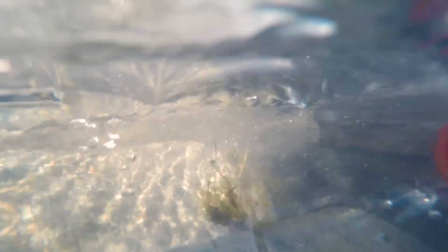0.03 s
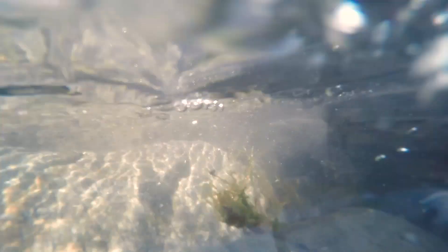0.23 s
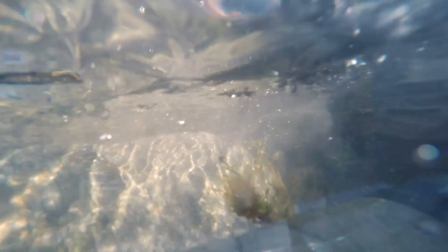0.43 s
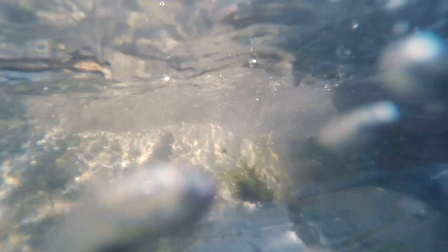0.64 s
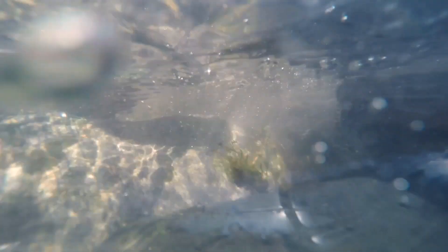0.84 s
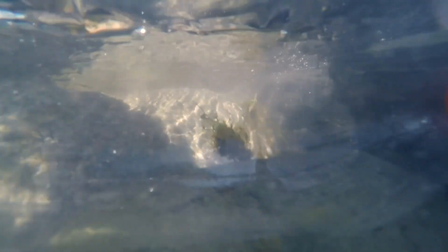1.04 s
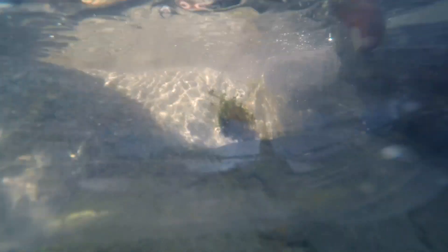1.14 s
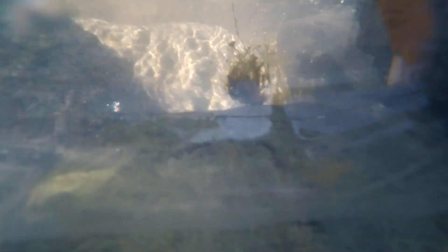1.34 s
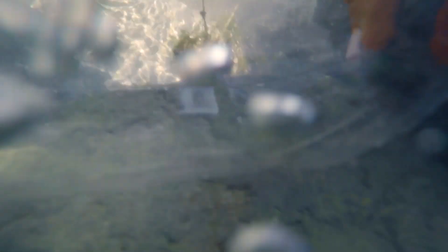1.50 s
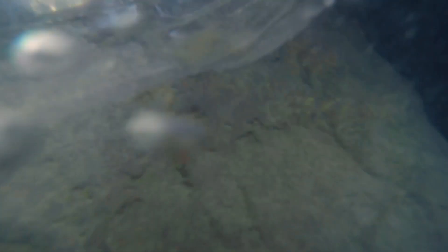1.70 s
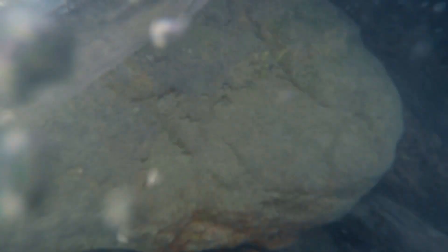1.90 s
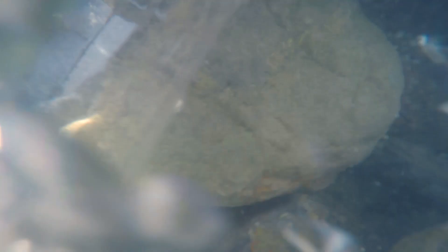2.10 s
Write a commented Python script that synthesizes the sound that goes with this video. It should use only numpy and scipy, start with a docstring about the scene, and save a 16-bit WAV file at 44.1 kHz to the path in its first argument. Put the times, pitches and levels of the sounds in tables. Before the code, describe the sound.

Muffled rush of a shallow rocky stream heard by a microphone inside a submerged housing; low rumble swells, close bubbles pop and crackle thickest midway, a sharp knock follows, then the rumble eases and the rush opens.

```python
"""A camera is held just under the surface of a fast, stony stream.
From the start, shaped noise gives the deep buffeting of its housing and the muffled rush of the rapids.
Air bubbles snap and ring close by as dying tones, thickest at about one second, in crackling torn water.
A sharp knock and two faint gliding whistles of narrow-band noise follow.
At the end the rumble eases and the rush opens up."""
import sys
import numpy as np
from scipy import signal
from scipy.fft import rfft, irfft
from scipy.io import wavfile
from scipy.ndimage import uniform_filter1d

SR = 44100
rng = np.random.default_rng(int(sys.argv[2]) if len(sys.argv) > 2 else 0)


def output_pcm(signal):
    """Save a mono or channel-first signal as 16-bit PCM at the path in sys.argv[1].

    Samples are clipped to [-1, 1] before scaling.
    """
    pcm = np.clip(np.atleast_2d(signal).T, -1, 1) * 32767
    wavfile.write(sys.argv[1], SR, np.round(pcm).astype(np.int16))


N = 94815
T = np.arange(N) / SR
RING_T = np.arange(2600) / SR  # time axis of one short sound [s]

# rush of the rapids: (time [s], middle level [dB], upper-middle level [dB], fizz level [dB])
RUSH_LEVELS = [(0, -50, -59, -75), (.22, -47.5, -58, -71), (.45, -43, -56, -69), (.75, -42, -53, -68),
               (1.0, -41, -53, -67), (1.33, -39, -52, -67), (1.5, -44.5, -53, -68), (1.7, -48.5, -59, -72),
               (1.82, -53, -64, -77), (1.98, -49, -59, -76), (2.07, -45, -54, -68), (2.15, -42, -48, -62)]


def amp(db):
    """Decibels to gain."""
    return 10 ** (np.asarray(db) / 20)


def unit(x):
    """Scales to an rms of one."""
    return x / np.sqrt(np.mean(x ** 2) + 1e-20)


def level(table, column=1):
    """Gain over time from one dB column of a table."""
    table = np.array(table)
    return amp(np.interp(T, table[:, 0], table[:, column]))


def add(mix, start_s, sound):
    """Mixes a sound in at a time, cut at the end of the mix."""
    part = mix[max(round(start_s * SR), 0):][:len(sound)]
    part += sound[:len(part)]


def noise(colour):
    """Gaussian noise of unit rms with a spectrum given as (frequency [Hz], level [dB])."""
    hz, db = np.transpose(colour)
    bin_hz = np.fft.rfftfreq(N, 1 / SR)
    gain = amp(np.interp(np.log(bin_hz + 1), np.log(hz), db))
    return unit(irfft(rfft(rng.standard_normal(N)) * gain, N))


def patchy(x, patchy_db, flicker_db):
    """Lets small patches of the spectrum, and the whole of it, rise and fall at random (rms dB)."""
    z = signal.stft(x, nperseg=512, noverlap=384)[2]
    patches = uniform_filter1d(rng.standard_normal(z.shape), size=5, axis=0)  # across frequency
    patches = unit(uniform_filter1d(patches, size=14, axis=1))  # across time
    flicker = unit(uniform_filter1d(rng.standard_normal(z.shape[1]), size=5))
    z = z * amp(patchy_db * patches + flicker_db * flicker)
    return unit(signal.istft(z, nperseg=512, noverlap=384)[1][:N])


def steady(x, size):
    """Evens out the slow swells of a noise by dividing by its smoothed power's root."""
    power = uniform_filter1d(uniform_filter1d(x ** 2, size), size)
    return x / np.sqrt(power + 1e-9)


def decay(t, t60_s):
    """Exponential decay that falls 60 dB in t60_s."""
    return np.exp(-np.log(1000) * t / t60_s)


def ring(hz, t60_s):
    """One ringing resonance: swells over about its first cycle, then dies as its pitch climbs slightly."""
    swell_cycles, pitch_rise = 1.1, .03
    glide = 1 + pitch_rise * np.minimum(RING_T / t60_s, 1)
    swell = 1 - np.exp(-(RING_T * hz / swell_cycles) ** 2)
    shape = swell * decay(RING_T, t60_s)
    return shape / shape.max() * np.sin(2 * np.pi * np.cumsum(hz * glide) / SR)


def snap():
    """The brief crack of a water film breaking: a dying noise burst, band-passed."""
    decay_s, low_hz, high_hz = .0005, 1100, 5000
    burst = rng.standard_normal(len(RING_T)) * np.exp(-RING_T / decay_s)
    band = signal.butter(1, [low_hz, high_hz], "bandpass", fs=SR, output="sos")
    burst = uniform_filter1d(signal.sosfilt(band, burst), size=2)
    return 2 * burst / np.linalg.norm(burst)


def current():
    """Eddies press on the housing: a deep sway, a rumble and a churn above them."""
    # push of the current: (time [s], sway level [dB], rumble level [dB])
    push_levels = [(0, -31, -32), (.17, -32, -29), (.25, -23, -24), (.33, -27, -25), (.55, -23, -22),
                   (.75, -18, -20), (.95, -15, -16), (1.1, -22, -17), (1.18, -21, -20), (1.25, -15, -9.5),
                   (1.33, -11, -15), (1.42, -15, -9.5), (1.5, -23, -22), (1.59, -12, -22), (1.66, -16, -21),
                   (1.75, -13, -21), (1.81, -24, -28), (1.97, -28, -28), (2.07, -38, -34), (2.15, -37, -35)]
    # low churning of the eddies: (time [s], level [dB])
    churn_levels = [(0, -41), (.2, -38), (.5, -34.5), (.8, -29.5), (1.05, -28), (1.15, -28), (1.25, -25),
                    (1.34, -35), (1.42, -30), (1.5, -37), (1.59, -45), (1.65, -30), (1.75, -44),
                    (1.85, -40), (1.97, -32), (2.06, -37), (2.15, -35)]
    # spectra of the three: (frequency [Hz], level [dB])
    sway_colour = [(6, -25), (14, -10), (24, -1), (42, 0), (52, -5), (70, -20), (150, -55), (600, -110)]
    rumble_colour = [(20, -22), (42, -6), (60, 0), (68, 0), (85, -5), (115, -7), (160, -22), (260, -44),
                     (600, -85), (2000, -130)]
    churn_colour = [(50, -25), (100, -4), (135, 0), (190, -2), (230, -11), (275, -11), (340, -19),
                    (500, -30), (1000, -55), (4000, -100)]
    sway = level(push_levels, column=1) * steady(noise(sway_colour), size=2600)
    rumble = level(push_levels, column=2) * steady(noise(rumble_colour), size=2000)
    churn = level(churn_levels) * steady(noise(churn_colour), size=1400)
    return sway + rumble + churn


def rush():
    """The rapids heard through water: gurgle, muffled roar and a trace of fizz, all patchy noise."""
    # hollow gurgle below the roar: (time [s], level [dB])
    gurgle_levels = [(0, -56), (.22, -50), (.45, -46), (.75, -41), (.96, -35), (1.1, -39), (1.3, -35),
                     (1.5, -42), (1.65, -51), (1.8, -53), (1.92, -49), (2.07, -44), (2.15, -44)]
    # spectra of the four bands: (frequency [Hz], level [dB])
    gurgle_colour = [(150, -15), (300, -4), (400, 1), (560, -4), (720, -10), (900, -13), (1150, -19),
                     (2000, -42), (6000, -80)]
    middle_colour = [(400, -25), (800, -15), (1050, -7), (1350, 0), (1550, -1), (1780, -1), (2100, -8),
                     (2500, -13), (3300, -32), (5000, -60), (10000, -80)]
    upper_colour = [(1500, -30), (2150, -8), (2500, 0), (2900, -2), (3400, -4), (4200, -13), (5000, -19),
                    (5600, -17), (6400, -30), (10000, -50)]
    fizz_colour = [(2500, -15), (5000, 3), (6500, 2), (8000, -1), (9000, 0), (11000, -3), (14500, -4),
                   (15500, -16), (17000, -36)]
    gurgle = level(gurgle_levels) * patchy(noise(gurgle_colour), patchy_db=2, flicker_db=1)
    middle = level(RUSH_LEVELS, column=1) * patchy(noise(middle_colour), patchy_db=1.5, flicker_db=.7)
    upper = level(RUSH_LEVELS, column=2) * patchy(noise(upper_colour), patchy_db=2.8, flicker_db=.8)
    fizz = level(RUSH_LEVELS, column=3) * patchy(noise(fizz_colour), patchy_db=2.8, flicker_db=1.6)
    return gurgle + middle + upper + fizz


def far_bubbles():
    """Many small bubbles ring at random within the rush, the higher ones weaker and shorter."""
    rate_per_s, ring_cycles = 260, 22
    base_db, spread_db = -5, 3.2  # relative to the middle of the rush
    out = np.zeros(N)
    for when, pitch, size in rng.random((int(rate_per_s * N / SR), 3)):
        hz = 1150 * 2 ** (2.1 * pitch)
        boost_db = spread_db * min(-np.log(1 - size), 4)  # few are loud
        db = base_db + boost_db - 14 * pitch ** 2
        add(out, when * N / SR, amp(db) * ring(hz, ring_cycles / hz))
    return out * level(RUSH_LEVELS)


def close_bubbles():
    """Bubbles snap, push and ring right at the housing; the tiniest only tick as they burst."""
    # close bubbles: (time [s], pitch [Hz], ring level [dB], ring time to -60 dB [s], snap level [dB])
    bubbles = [ (.1022, 11100, -21, .005, -42), (.1022, 13300, -28, .003, -55),
               (.1022, 2750, -32, .004, -50), (.1023, 3900, -33, .004, -55), (.2253, 1310, -28, .006, -31),
               (.2255, 6720, -36, .009, -45), (.2477, 8600, -47, .006, -50), (.374, 4200, -41, .014, -50),
               (.6146, 3600, -6, .006, -30), (.6146, 1500, -15, .005, -45), (.6190, 3150, -14, .007, -27),
               (.6190, 6700, -13, .0035, -45), (.6194, 5450, -19, .006, -50), (.767, 5580, -39, .014, -54),
               (.8192, 2560, -21, .020, -50), (.9362, 2580, -29, .010, -36), (.9375, 6400, -38, .012, -50),
               (.9482, 1300, -21, .014, -31), (.949, 2200, -19, .012, -45), (.9568, 1590, -23, .016, -25),
               (.9632, 4140, -18, .016, -42), (.9642, 2150, -23, .014, -50), (.975, 2630, -13, .010, -42),
               (.9753, 950, -18, .022, -45), (.9798, 7750, -28, .012, -32), (.9802, 2260, -23, .014, -48),
               (.9832, 1180, -21, .014, -30), (.9835, 8180, -32, .010, -38), (1.013, 8600, -32, .005, -38),
               (1.017, 2170, -27, .018, -25), (1.0221, 2180, -8, .022, -23), (1.0235, 1270, -11, .022, -32),
               (1.0246, 4500, -23, .005, -18), (1.0243, 9930, -28, .006, -36),
               (1.0376, 2000, -18, .015, -34), (1.043, 2900, -25, .012, -36),
               (1.0743, 2020, -24, .012, -17), (1.0745, 6900, -24, .005, -40),
               (1.0995, 3920, -35, .016, -60), (1.3836, 1050, -26, .006, -26),
               (1.3836, 2600, -19, .004, -40), (1.4366, 1700, -23, .007, -40),
               (1.4368, 3530, -20, .005, -28), (1.4369, 5100, -25, .003, -45),
               (1.483, 1300, -30, .006, -31), (1.5524, 3250, -16, .006, -29),
               (1.5555, 1570, -26, .016, -50), (1.566, 2900, -36, .008, -45), (1.635, 1010, -35, .009, -36),
               (1.679, 950, -40, .012, -46), (1.9445, 3340, -38, .022, -60), (2.096, 13200, -42, .004, -52),
               (2.117, 7100, -28, .003, -32), (2.1362, 13900, -43, .005, -52)]
    # dry ticks of tiny bursting bubbles: (time [s], level [dB])
    ticks = [(.275, -42), (.361, -46), (.4248, -33), (.6052, -48), (.6475, -40), (.8124, -33), (.863, -44),
             (.895, -42), (.918, -40), (1.005, -40), (1.209, -43), (1.5045, -39), (1.954, -42)]
    kick_db, kick_s = -25, .0003  # blunt push of pressure, relative to its bubble
    u = RING_T / kick_s
    kick = amp(kick_db) * 4 * u * (2 - u) * np.exp(-u)
    out = np.zeros(N)
    for start_s, hz, db, t60_s, snap_db in bubbles:
        add(out, start_s, amp(db) * (ring(hz, t60_s) + kick) + amp(snap_db) * snap())
    for start_s, db in ticks:
        add(out, start_s, amp(db) * snap())
    return out


def housing(x):
    """The camera housing adds a short, dull ring: convolution with a dying coloured noise."""
    # spectrum of the ring: (frequency [Hz], level [dB])
    tail_colour = [(200, -8), (400, 3), (700, 3), (1500, 1), (2500, -3), (3500, -7), (5500, -11),
                   (9000, -22), (16000, -34)]
    tail_db, delay_s, t60_s = -13, .0004, .02
    tail = noise(tail_colour)[:len(RING_T)] * decay(RING_T, t60_s) * (RING_T > delay_s)
    tail /= np.linalg.norm(tail)
    return x + amp(tail_db) * signal.oaconvolve(x, tail)[:N]


def buffets():
    """Strong eddies buffet the housing with short, low gulps: swelling, dying sines."""
    # gulps: (time [s], pitch [Hz], peak level [dB], ring time to -60 dB [s])
    gulps = [(.226, 127, -15, .16), (1.222, 190, -18, .1), (1.225, 270, -23, .16), (1.06, 130, -16, .1),
             (1.38, 104, -7, .14), (1.383, 260, -24, .08)]
    out, t = np.zeros(N), T[:SR // 4]
    for start_s, hz, db, t60_s in gulps:
        shape = (1 - np.exp(-(t * hz / 2) ** 2)) * decay(t, t60_s)
        add(out, start_s, amp(db) * shape / shape.max() * np.sin(2 * np.pi * hz * t))
    return out


def swirl():
    """Torn water crackles as it passes the housing: noise with a fast random level."""
    # burst of torn water and livelier flow at the end: (time [s], level [dB])
    swirl_levels = [(.77, -70), (.83, -41), (.88, -47), (.93, -42), (.955, -34), (.97, -37), (.982, -30),
                    (1.0, -48), (1.03, -33), (1.05, -41), (1.1, -52), (1.2, -68), (1.9, -68), (2.07, -51),
                    (2.15, -48)]
    # spectrum: (frequency [Hz], level [dB])
    swirl_colour = [(250, -8), (500, -1), (1000, 0), (2200, -3), (3200, -6), (4500, -22), (7000, -36),
                    (16000, -60)]
    crackle_db = 4  # rms
    crackle = unit(uniform_filter1d(rng.standard_normal(N), size=90))
    return level(swirl_levels) * unit(noise(swirl_colour) * amp(crackle_db * crackle))


def knocks():
    """A sharp blow sets the housing's modes ringing for a few milliseconds, with a snap."""
    # blows: (time [s], level [dB])
    blows = [(1.0605, -1)]
    # modes of the housing: (frequency [Hz], level [dB], ring time to -60 dB [s])
    modes = [(1356, -7, .010), (2476, -1, .008), (3400, -1, .005), (4650, -6, .009), (6000, -9, .003),
             (7060, -9, .005)]
    snap_db = -10  # relative to the blow
    out = np.zeros(N)
    for start_s, db in blows:
        body = sum(amp(mode_db) * ring(hz, t60_s) for hz, mode_db, t60_s in modes)
        add(out, start_s, amp(db) * (body + amp(snap_db) * snap()))
    return out


def whistles():
    """Quivering air whistles faintly: low-passed complex noise shifted up to a gliding pitch."""
    # one curve per whistle: (time [s], pitch [Hz], level [dB])
    curves = [
        [(1.09, 3900, -62), (1.125, 4850, -57), (1.18, 4500, -58), (1.27, 3900, -60)],
        [(1.45, 2600, -53), (1.51, 2700, -53), (1.55, 2650, -62), (1.62, 2500, -49), (1.655, 2750, -47),
         (1.71, 2850, -57)],
    ]
    width_hz = 260
    lowpass = signal.butter(2, width_hz / 2, fs=SR, output="sos")
    out = np.zeros(N)
    for curve in curves:
        curve_s, curve_hz, _ = np.transpose(curve)
        fuzz = signal.sosfilt(lowpass, rng.standard_normal(N) + 1j * rng.standard_normal(N))
        phase = 2 * np.pi * np.cumsum(np.interp(T, curve_s, curve_hz)) / SR
        tone = unit((fuzz * np.exp(1j * phase)).real)
        gate = 1. * ((T > curve_s[0]) & (T < curve_s[-1]))
        out += tone * level(curve, column=2) * uniform_filter1d(gate, size=800)
    return out


def scene():
    """Everything that reaches the submerged microphone; only close bubbles and knocks ring the tail."""
    water = current() + rush() + far_bubbles() + buffets() + swirl() + whistles()
    return (water + housing(close_bubbles() + knocks()))[None]


def record(dry):
    """The loudest peaks overload softly; then a linear-phase low-pass limits the band."""
    cut_hz = 16700
    held = dry / (1 + dry ** 8) ** (1 / 8)
    lowpass = signal.firwin(511, cut_hz, window=("kaiser", 9), fs=SR)
    return signal.oaconvolve(held, lowpass[None], "same")


dry = scene()
out = record(dry)
output_pcm(out)
```